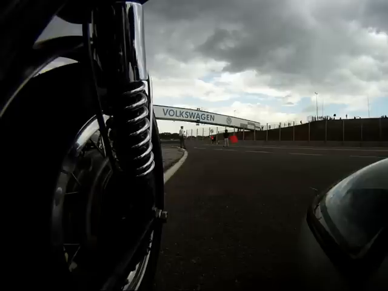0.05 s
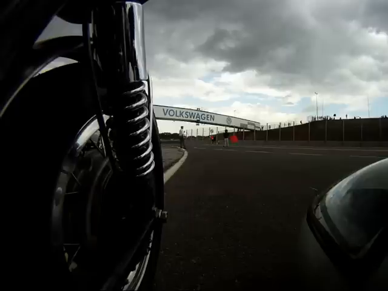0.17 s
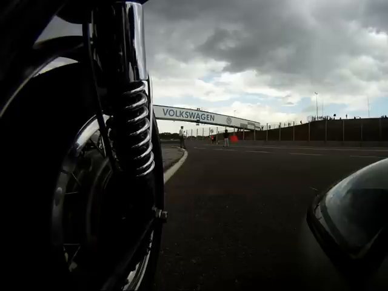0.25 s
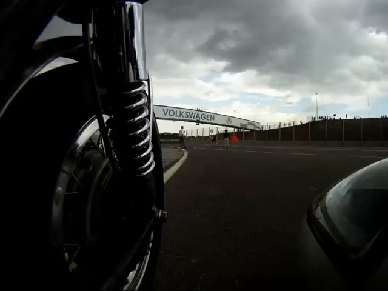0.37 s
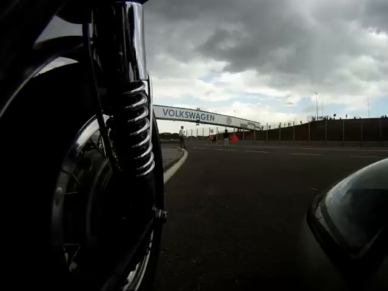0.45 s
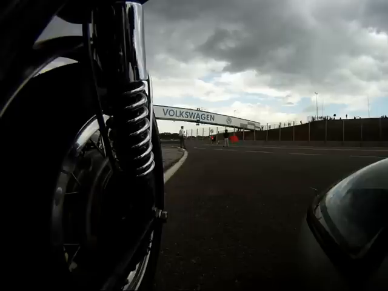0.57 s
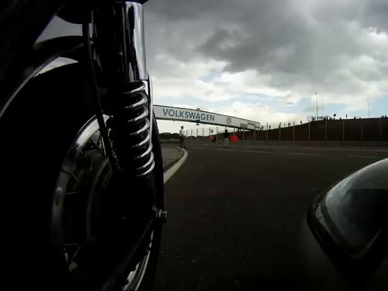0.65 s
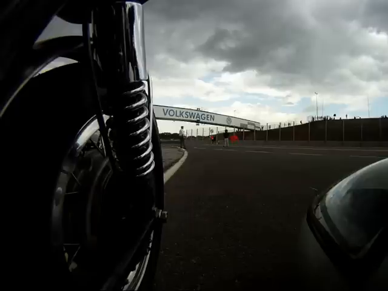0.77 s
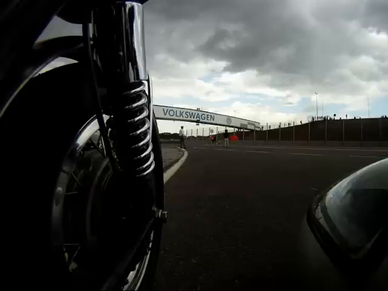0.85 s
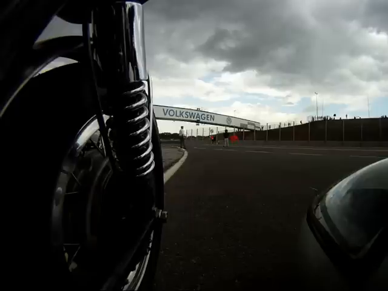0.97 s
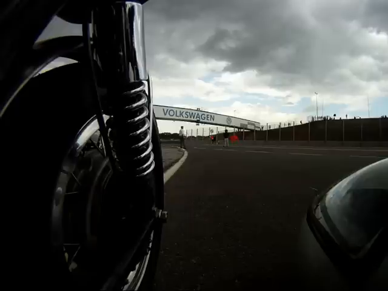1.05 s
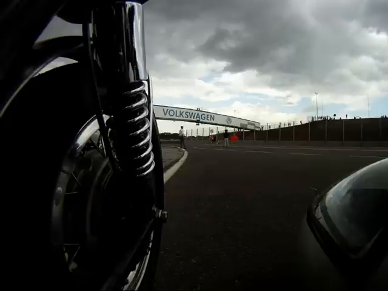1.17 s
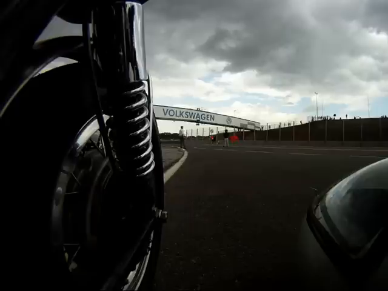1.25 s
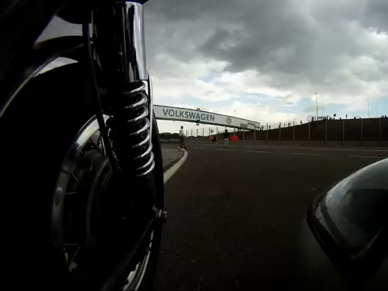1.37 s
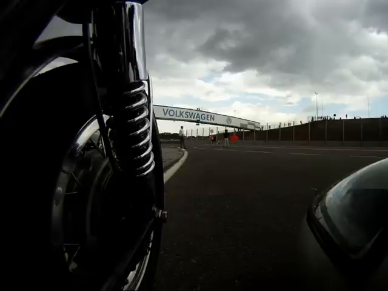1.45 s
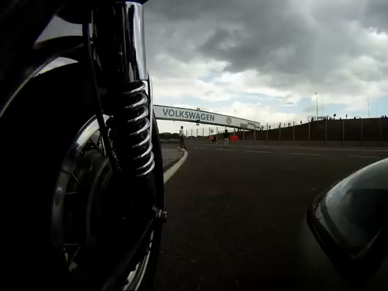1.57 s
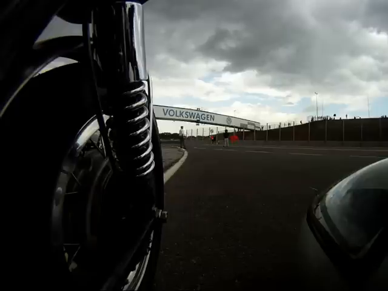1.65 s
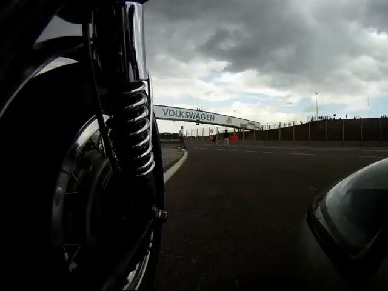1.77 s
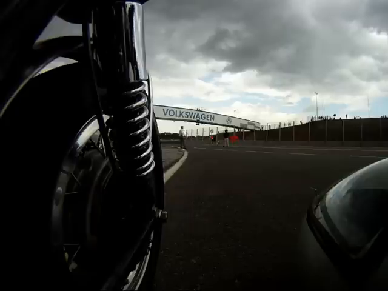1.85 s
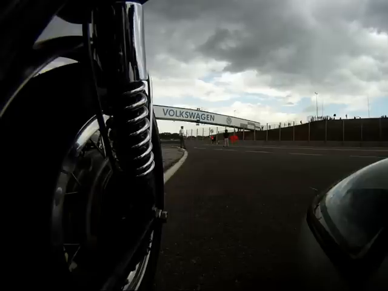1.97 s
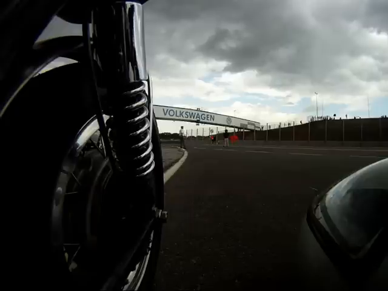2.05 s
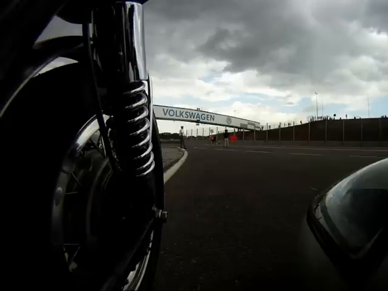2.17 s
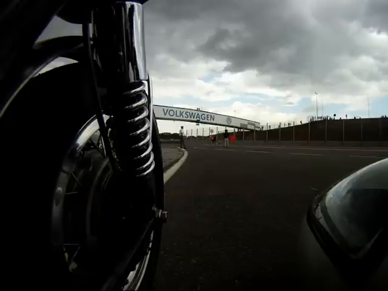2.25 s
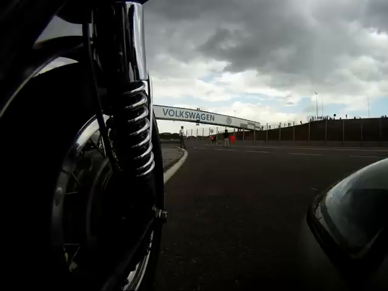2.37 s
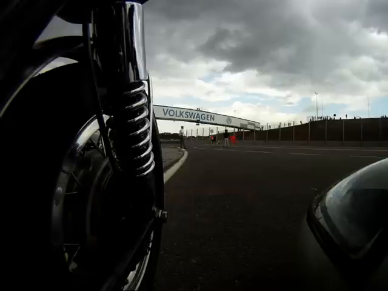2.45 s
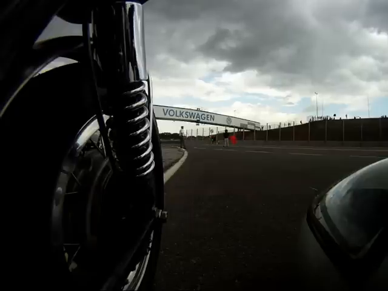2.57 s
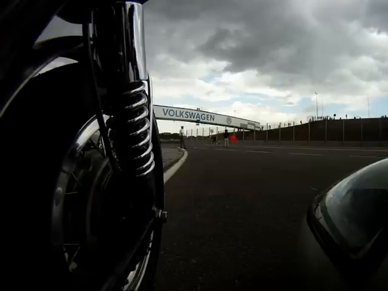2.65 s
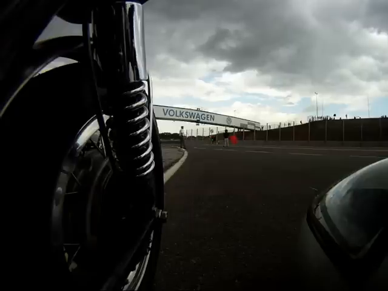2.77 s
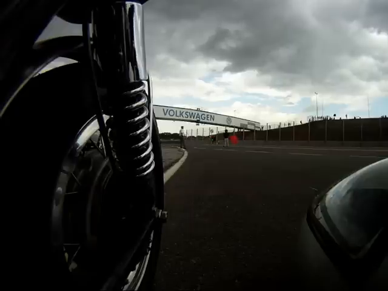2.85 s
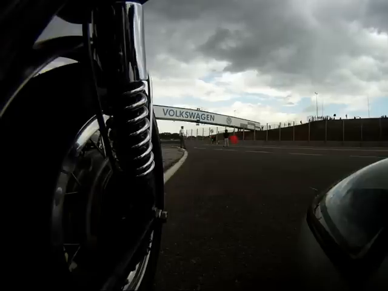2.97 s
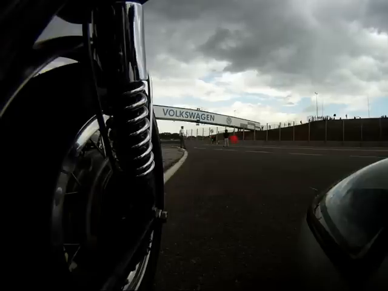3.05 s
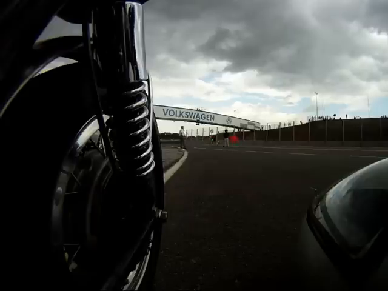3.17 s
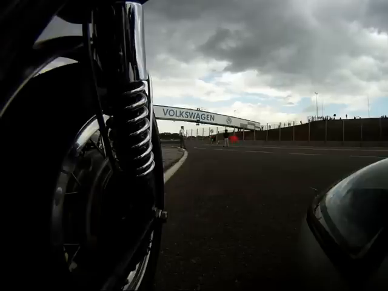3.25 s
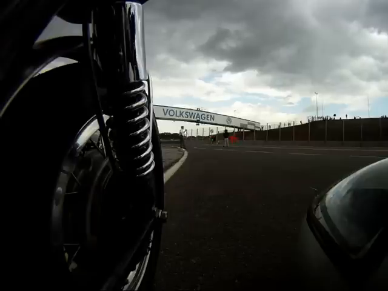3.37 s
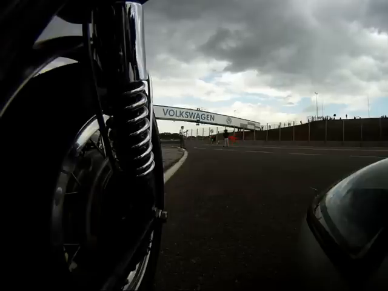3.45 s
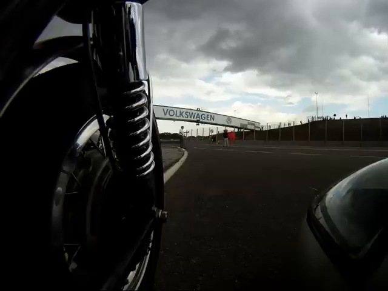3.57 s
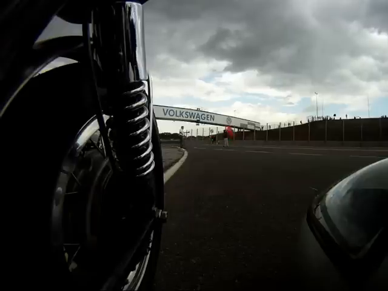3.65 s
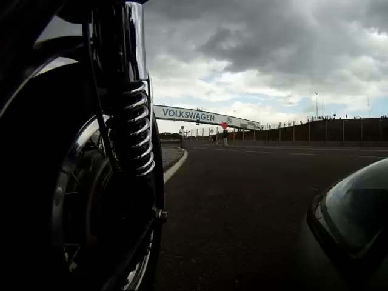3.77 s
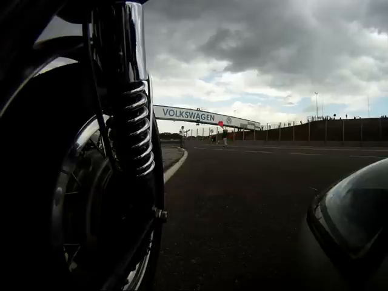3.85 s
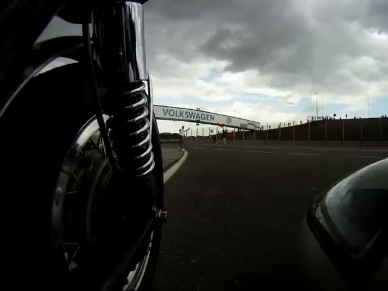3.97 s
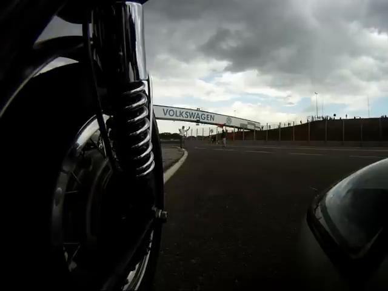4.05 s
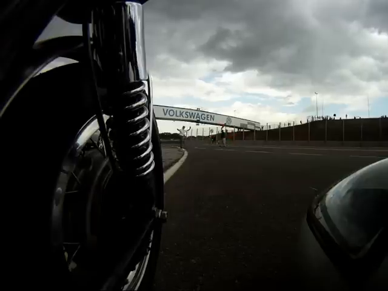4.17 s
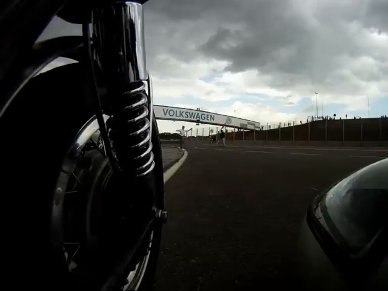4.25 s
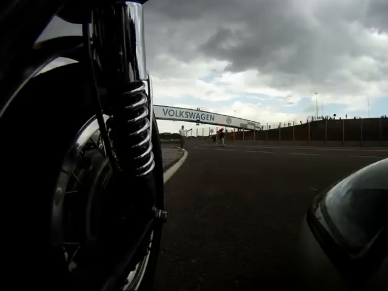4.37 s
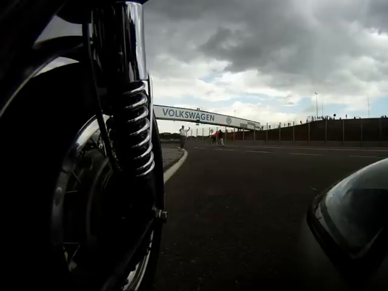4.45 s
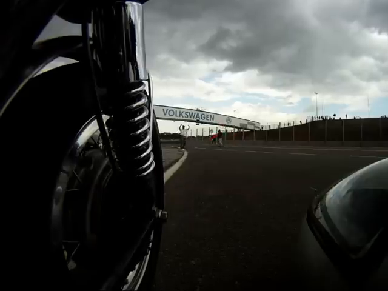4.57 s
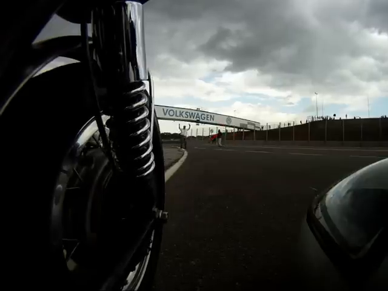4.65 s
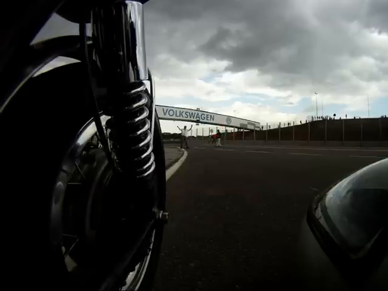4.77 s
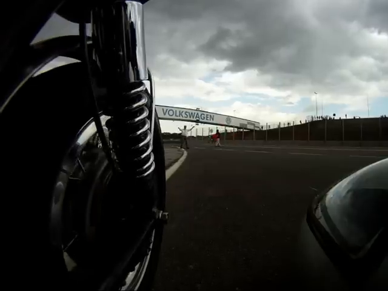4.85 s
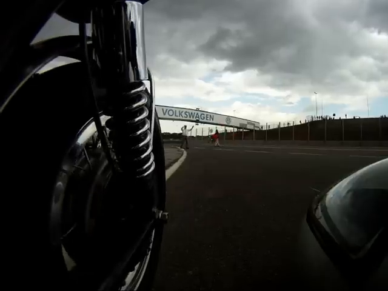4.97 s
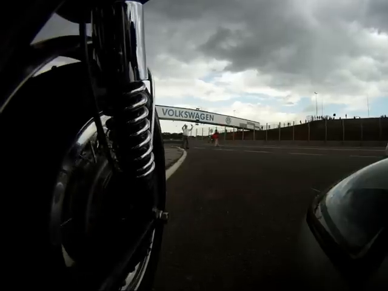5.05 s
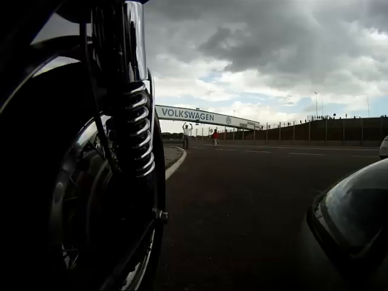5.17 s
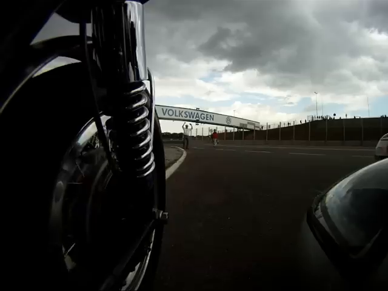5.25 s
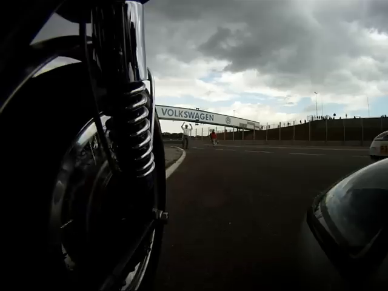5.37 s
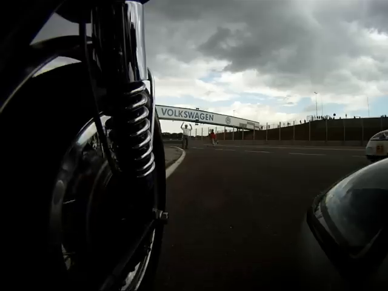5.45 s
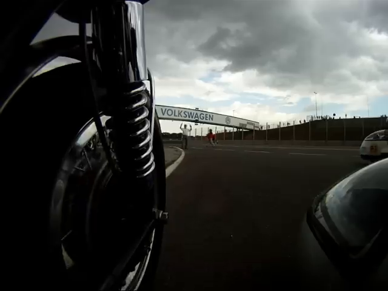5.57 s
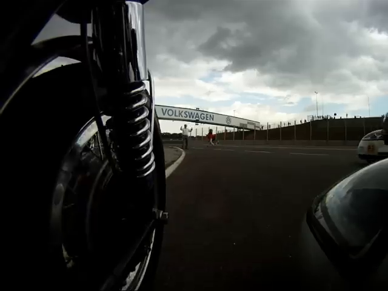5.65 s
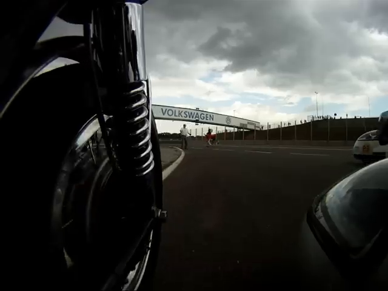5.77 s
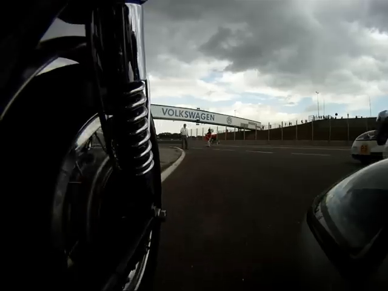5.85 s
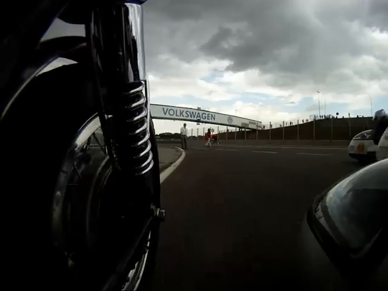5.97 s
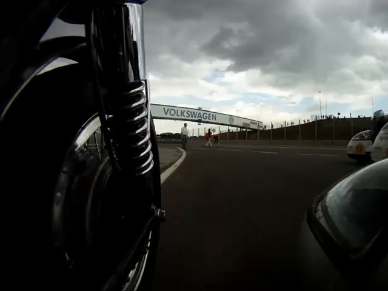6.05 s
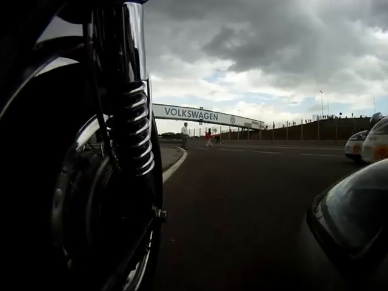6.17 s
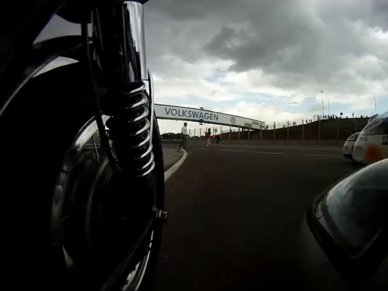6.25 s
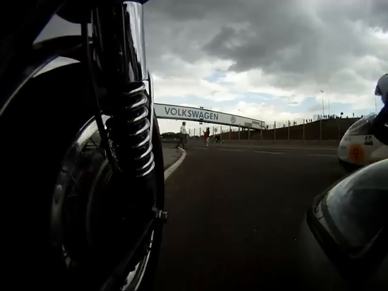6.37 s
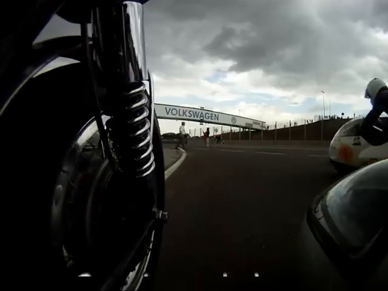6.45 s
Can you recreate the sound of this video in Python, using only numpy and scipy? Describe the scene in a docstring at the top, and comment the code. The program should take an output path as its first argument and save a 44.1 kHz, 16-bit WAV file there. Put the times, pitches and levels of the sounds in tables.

```python
"""Racing sidecar pulling away.

A four-stroke twin idles: low orders throb, noise clatters, uneven firings ring the pipe, the frame rumbles.
Ringing noise bursts tick beside it, likely the fuel pump. The throttle opens, firings strike the body modes,
gliding sines chirp as the clutch grabs, the drive train knocks, the pipe booms and low noise thumps and swells.
Revs stumble up, peak and sag under load while the firings merge into a drone of clean sine orders."""
import sys
import numpy as np
from scipy import signal
from scipy.fft import rfft, irfft, next_fast_len
from scipy.io import wavfile
from scipy.ndimage import uniform_filter1d, map_coordinates

SR = 44100
rng = np.random.default_rng(int(sys.argv[2]) if len(sys.argv) > 2 else 0)


def output_pcm(signal):
    """Save a mono or channel-first signal as 16-bit PCM at the path in sys.argv[1].

    Samples are clipped to [-1, 1] before scaling.
    """
    pcm = np.clip(np.atleast_2d(signal).T, -1, 1) * 32767
    wavfile.write(sys.argv[1], SR, np.round(pcm).astype(np.int16))


N = 286650


def amp(db):
    """Decibels to gain."""
    return 10 ** (np.asarray(db) / 20)


def unit(x):
    """Scale to rms 1."""
    return x / np.sqrt(np.mean(x ** 2) + 1e-20)


def steady(x, size=8800):
    """Hold the running rms near 1; size in samples."""
    power = uniform_filter1d(uniform_filter1d(x * x, size), size // 2)
    return x / np.sqrt(np.abs(power) + 1e-14)


def curves(rows):
    """One value per sample for each column after the time."""
    time_s, *columns = np.transpose(rows)
    return [np.interp(np.arange(N) / SR, time_s, column) for column in columns]


def wobble(rate_hz):
    """Smooth random curve, rate_hz knots a second."""
    knots = rng.standard_normal(int(N * rate_hz / SR) + 4)
    return map_coordinates(knots, [np.arange(N) * rate_hz / SR])


def ramp(start_s, rise_s):
    """0 to 1, starting at start_s."""
    return np.clip((np.arange(N) / SR - start_s) / rise_s, 0, 1)


def noise():
    """Fresh white noise."""
    return rng.standard_normal(N)


def filtered(x, response):
    """x times a complex response of frequency."""
    size = next_fast_len(N + SR // 2)
    spectrum = rfft(x, size) * response(np.fft.rfftfreq(size, 1 / SR))
    return irfft(spectrum, size)[:N]


def coloured(x, spectrum):
    """x through (Hz, dB) points with closed ends, at rms 1."""
    hz, db = np.transpose(spectrum)
    log_hz = np.log(np.r_[hz[0] / 2, hz, hz[-1] * 2])
    closed_db = np.r_[-120, db, -120]
    return unit(filtered(x, lambda f: amp(np.interp(np.log(f + 1), log_hz, closed_db))))


def ring(x, modes, low_hz, high_hz):
    """x through resonances of alternating sign, dark outside the band."""
    def response(f):
        body = 0
        for k, (centre_hz, width_hz, db) in enumerate(modes):
            damping = 1j * f * width_hz
            body = body + (-1) ** k * amp(db) * damping / (centre_hz ** 2 - f * f + damping)
        return body / (1 + (low_hz / (f + 1)) ** 6) / (1 + (f / high_hz) ** 6)
    return filtered(x, response)


def burst(start_s, t60_s):
    """Envelope that starts at start_s and dies away."""
    t = np.maximum(np.arange(N) / SR - start_s, 0)
    return (1 - np.exp(-t / 0.00024)) * amp(-60 * np.minimum(t / t60_s, 2))


def firings(cycle, scatter_db, jitter_cycles):
    """One pulse train per cylinder, firing alternately, two firings a cycle in all."""
    count = np.arange(1, int(2 * cycle[-1]))
    chance = rng.standard_normal((len(count), 2))
    at = np.interp(count / 2 + jitter_cycles * chance[:, 0], cycle, np.arange(N))
    # windowed sinc places each pulse between samples
    taps = at.astype(int)[:, None] + np.arange(-7, 9)
    off = taps - at[:, None]
    pulse = np.sinc(off) * np.cos(np.pi * off / 16) ** 2 * amp(scatter_db * chance[:, 1:])
    taps = np.clip(taps, 0, N - 1)
    return [np.bincount(taps[c::2].ravel(), pulse[c::2].ravel(), N) for c in (0, 1)]


def puffs(cycle, depth_db):
    """Noise reset at each firing interval, then falling by depth_db (rising if negative) until the next."""
    return noise() * amp(-depth_db * (2 * cycle % 1))


# hum of the idling engine: (order of the cycle, level [dB])
IDLE_HUM = [(6, -44.5), (7, -43), (10, -34), (11, -45.5), (12, -46.5), (14, -39.5), (15, -41.5),
            (16, -47.5), (20, -45.5), (22, -49), (24, -49.5), (26, -46.5), (30, -56), (35, -52.5)]
# valve gear spectrum: (frequency [Hz], density [dB per Hz])
CLATTER = [(200, 13.5), (400, 0.5), (600, -6.5), (850, -5.5), (1200, 0), (1650, -10.5), (2000, 2),
           (2450, -2.5), (3200, -7), (4200, -9), (5200, -10), (6200, -18)]
# engine covers rung by the valve gear: (frequency [Hz], width [Hz], level [dB])
COVER_MODES = [(1916, 37, 3.5), (2245, 92, 1.5), (2487, 49, 3), (2847, 23, 1.5), (3135, 75, -1),
               (3300, 87, -4.5), (3400, 63, -7)]


def idle(cycle, load):
    """Low orders throb while the valve gear clatters; both fade as load comes on."""
    hum = np.zeros(N)
    for order, db in IDLE_HUM:
        phase = 2 * np.pi * (order * cycle + rng.random()) + 0.21 * wobble(7.1)
        hum += amp(db + 1.48 * wobble(5.81)) * np.sin(phase)
    shake = amp(1.0 * wobble(30) + 1.6 * wobble(190))
    valves = amp(-45.5) * coloured(shake * puffs(cycle, depth_db=1.0), CLATTER)
    covers = amp(-48.5) * unit(ring(shake * noise(), COVER_MODES, low_hz=1700, high_hz=3700))
    return (1 - load ** 2) * (np.sqrt(2) * hum + valves + covers)


# pipe resonances: (frequency [Hz], width [Hz], level [dB])
PIPE = [(59.7, 42, -11.5), (90.4, 35, 3.5), (153.7, 20.7, 4.5), (225, 81, -7), (274, 33.5, -4.5),
        (407, 70, -34.5)]
THUD_IDLE_DB, THUD_LOADED_DB = -40, -25  # before the lumpy fade


def exhaust(cycle, load, lumpy):
    """Uneven firings and gas noise ring the pipe, harder under load."""
    first, second = firings(cycle, scatter_db=2, jitter_cycles=0.0079)
    gas = steady(first + .7 * second) + .9 * noise()
    thud_db = THUD_IDLE_DB + load * (THUD_LOADED_DB - THUD_IDLE_DB)
    return lumpy * amp(thud_db) * steady(ring(gas, PIPE, low_hz=46, high_hz=470))


# frame spectrum: (frequency [Hz], density [dB per Hz])
RUMBLE = [(25, -15), (45, -2.5), (90, 1), (250, -7), (450, -14), (600, -29)]
# drive train knocks: (time [s], level [dB], t60 [s])
KNOCKS = [(4.08, -37, .09), (4.119, -33, .04), (4.146, -31, .043), (4.28, -34, .14), (4.339, -33.5, .11),
          (4.755, -27, .064), (5.415, -21, .08), (5.432, -7.5, .034)]
# drive train resonances: (frequency [Hz], width [Hz], level [dB])
KNOCK_MODES = [(1110, 610, -10.5), (1640, 370, -6), (2010, 200, 1), (2265, 150, 3), (3120, 570, -12.5)]
# level at idle; change under load; change as the firings even out
RUMBLE_IDLE_DB, RUMBLE_LOAD_DB, RUMBLE_SMOOTH_DB = -43.5, 15, -4


def chassis(load, lumpy):
    """The frame shudders as the engine takes the load; the drive train knocks as it takes up slack."""
    rumble_db = RUMBLE_IDLE_DB + RUMBLE_LOAD_DB * load + RUMBLE_SMOOTH_DB * (1 - lumpy)
    rumble = amp(rumble_db) * coloured(noise(), RUMBLE)
    knocks = sum(amp(db) * burst(start_s, t60_s) for start_s, db, t60_s in KNOCKS)
    return rumble + knocks * unit(ring(noise(), KNOCK_MODES, low_hz=700, high_hz=5000))


# runs of pump strokes: (first stroke [s], interval [s], strokes [count], level before ringing [dB])
PUMP_RUNS = [(.1463, .08, 1, -40.5), (.371, .085, 2, -38), (.5985, .08, 1, -38.5), (.9043, .0787, 2, -38),
             (1.297, .0777, 8, -40), (1.982, .0664, 6, -38.5), (2.508, .0665, 6, -36.5),
             (2.976, .065, 3, -38), (3.241, .065, 1, -36), (3.3862, .064, 2, -39), (3.5845, .0698, 6, -39),
             (4.075, .069, 5, -38.5), (4.41, .05, 13, -40)]
# pump housing: (frequency [Hz], width [Hz], level [dB])
TICK_MODES = [(3230, 66, 6.5), (3940, 94, 1.5), (4420, 29, 2.5), (4640, 47, 4.5), (4777, 27, 6),
              (5440, 100, 1)]
PUMP_SCATTER_S, PUMP_SCATTER_DB = .001, 0.56  # from stroke to stroke


def pump():
    """Each stroke rattles a small metal housing; the strokes crowd together as the engine draws fuel."""
    ticks = []
    for first_s, interval_s, count, db in PUMP_RUNS:
        ticks += [(first_s + k * interval_s, db) for k in range(round(count))]
    ticks = np.array(ticks)
    ticks = ticks + rng.standard_normal(ticks.shape) * [PUMP_SCATTER_S, PUMP_SCATTER_DB]
    strokes = np.zeros(N)
    t = np.arange(SR // 20) / SR
    for start_s, db in ticks:
        # slow and fast decay
        rattle = amp(db + 9.5 - 60 * t / 0.12) + amp(db + 5.5 - 60 * t / 0.011)
        strokes[round(start_s * SR):][:len(t)] += rattle * rng.standard_normal(len(t))
    return ring(strokes, TICK_MODES, low_hz=2980, high_hz=7360)


# throttle: (time [s], opening [0-1])
THROTTLE = [(4.2, 0.17), (4.35, 0.56), (4.7, 0.7), (5.05, .35), (5.15, 0.72), (5.3, 0.4), (5.77, 0.89),
            (6, .45), (6.3, 0.32), (6.5, 0.25)]
# body modes driven by both cylinders alike: (frequency [Hz], width [Hz], level [dB])
EVEN_MODES = [(355, 14, 11), (487, 10, 1), (680, 17, -4), (962, 40, 8), (1078, 40, 11.5), (1252, 50, 13),
              (1596, 35, 7.5), (1932, 39, 8.5), (2456, 40, 5.5), (3350, 290, -18)]
# body modes driven by the cylinders' difference: (frequency [Hz], width [Hz], level [dB])
ODD_MODES = [(336, 17.6, 10), (458, 67, 12.5), (542, 290, 1), (671.4, 32, 8.5), (886, 120, 2.5),
             (1201, 23, 10.5), (1630, 140, -2), (2230, 73, -7), (3120, 110, -29)]
# casing spectrum: (frequency [Hz], density [dB per Hz])
RASP = [(200, 5), (450, -13), (750, -6.5), (1200, -1), (1450, -10.5), (1780, -3.5), (2100, 6.5), (2700, -9),
        (3200, -4.5), (4000, -17.5), (5200, -18.5), (6200, -19.5)]
TOP_SPEED_HZ = 53  # reference, four-stroke cycles a second
RASP_START_S, RASP_RISE_S = 3.84, 0.25  # bark and casing rasp fade in
# at reference speed, throttle open; growth with speed; drop with throttle shut
BARK_DB, BARK_DB_PER_OCTAVE, BARK_THROTTLE_DB = -20, 18, 1.5
RASP_DB, RASP_DB_PER_OCTAVE, RASP_THROTTLE_DB = -16, 9, 13.5


def rasp(cycle, speed_hz):
    """Each firing strikes the body modes and shakes the casing, harder with speed and throttle."""
    octaves = np.log2(speed_hz / TOP_SPEED_HZ)
    shut = 1 - curves(THROTTLE)[0]
    bark_db = BARK_DB + BARK_DB_PER_OCTAVE * octaves - BARK_THROTTLE_DB * shut
    rasp_db = RASP_DB + RASP_DB_PER_OCTAVE * octaves - RASP_THROTTLE_DB * shut
    first, second = firings(cycle, scatter_db=1.1, jitter_cycles=.0005)
    even = ring(first + second, EVEN_MODES, low_hz=350, high_hz=3800)
    odd = ring(first - second, ODD_MODES, low_hz=330, high_hz=3760)
    bark = steady(even + odd)
    # casing rattle repeats more closely from firing to firing at speed
    alike = np.clip(.58 * speed_hz / TOP_SPEED_HZ, 0, 1)
    t = np.arange(SR // 40) / SR
    rattle = np.zeros(N)
    for cylinder in (first, second):
        strike = rng.standard_normal(len(t)) * amp(-60 * t / 0.092)
        rattle += signal.fftconvolve(cylinder, strike)[:N]
    shake = amp(1.6 * wobble(45) + 0.2 * wobble(250))
    loose = unit(puffs(cycle, depth_db=-0.5))
    grit = shake * (np.sqrt(alike) * steady(rattle) + np.sqrt(1 - alike) * loose)
    casing = steady(coloured(grit, RASP))
    return ramp(RASP_START_S, RASP_RISE_S) * (amp(bark_db) * bark + amp(rasp_db) * casing)


# clutch chirps: (centre time [s], frequency [Hz], Gaussian half-width to e^-2 [s], level [dB])
CHIRPS = [(4.08, 850, .03, -50), (4.16, 830, .03, -47), (4.28, 970, .025, -39), (4.34, 1030, .025, -37),
          (4.36, 870, .025, -40), (4.52, 760, .02, -41), (4.61, 1480, .02, -38), (4.68, 880, .025, -36),
          (4.845, 860, .04, -32), (4.94, 840, .025, -27), (4.965, 850, .02, -34)]


def clutch():
    """The plates grab in short, rough, falling chirps."""
    out = np.zeros(N)
    t = np.arange(-SR // 10, SR // 10) / SR
    for centre_s, hz, length_s, db in CHIRPS:
        waver_rad = .5 * wobble(160)[:len(t)]
        tone = np.sin(2 * np.pi * hz * (t - 0.51 * t * t) + waver_rad)
        chirp = amp(db) * np.exp(-2 * (t / length_s) ** 2) * tone
        out[round(centre_s * SR) - SR // 10:][:len(t)] += chirp
    return out * amp(2 * wobble(150))


# pipe gain on the firing harmonics: (frequency [Hz], gain [dB])
BOOM_SHAPE = [(45, -34), (70, -11), (100, 0), (122, -5), (150, 6), (178, 0), (205, -30), (280, -8.5),
              (350, -24), (450, -15)]
# at reference speed; growth with speed; unsteadiness
BOOM_DB, BOOM_DB_PER_OCTAVE, BOOM_FLUTTER_DB = -18.5, 3, 3


def boom(cycle, speed_hz, load, lumpy):
    """One firing harmonic after another sweeps through the pipe's resonance and swells."""
    hz, db = np.transpose(BOOM_SHAPE)
    orders = np.arange(2, 16, 2)[:, None]
    gains = amp(np.interp(orders * speed_hz, hz, db))
    tone = np.sqrt(2) * np.sum(gains * np.sin(2 * np.pi * orders * cycle), axis=0)
    growth_db = BOOM_DB_PER_OCTAVE * np.log2(speed_hz / TOP_SPEED_HZ)
    level_db = BOOM_DB + growth_db + BOOM_FLUTTER_DB * wobble(35)
    return load * lumpy * amp(level_db) * tone


# low thumps and swells: (time [s], level [dB], t60 [s])
THUMPS = [(4.637, -17, 0.18), (4.942, -18.5, 0.24), (5.13, -21, 0.43), (5.216, -21.5, 0.21),
          (6.478, -18, 0.14)]
# thump spectrum: (frequency [Hz], density [dB per Hz])
THUMP_SPECTRUM = [(35, -14), (70, 1), (300, 8.5), (480, -5), (800, -30), (2000, -70)]


def thumps():
    """Low thumps and swells of decaying coloured noise."""
    envelope = sum(amp(db) * burst(start_s, t60_s) for start_s, db, t60_s in THUMPS)
    return coloured(noise(), THUMP_SPECTRUM) * envelope


# exhaust gain on even orders, cylinders alike: (frequency [Hz], gain [dB])
DRONE_EVEN = [(75, -4), (95, 0), (106, -1.5), (155, -1), (180, -7), (203, -14), (214, -7), (238, -15),
              (280, -9), (320, -11), (380, -17), (430, -30)]
# exhaust gain on odd orders, cylinders' difference: (frequency [Hz], gain [dB])
DRONE_ODD = [(150, -25), (220, -22), (262, -11), (300, -13), (370, -25)]
SMOOTH_S, SMOOTH_RISE_S = 5.25, 0.15  # lumpy firings even out
DRONE_DB, DRONE_FLUTTER_DB = -15.5, 1.3  # level; unsteadiness of each order
DRONE_THROTTLE_DB = 6.5  # growth of orders above 2, shut to open throttle


def drone(cycle, speed_hz):
    """At high revs the firings merge into clean orders, each swelling as it glides through a resonance."""
    push_db = DRONE_THROTTLE_DB * (curves(THROTTLE)[0] - .6)
    out = np.zeros(N)
    for order in range(2, 9):
        hz, db = np.transpose(DRONE_ODD if order % 2 else DRONE_EVEN)
        level_db = DRONE_DB + np.interp(order * speed_hz, hz, db) + DRONE_FLUTTER_DB * wobble(22)
        if order > 2:
            level_db = level_db + push_db
        out += amp(level_db) * np.sin(2 * np.pi * order * cycle)
    return np.sqrt(2 * ramp(SMOOTH_S, SMOOTH_RISE_S)) * out


# idle, stumbling pick-up, peak, sag under load: (time [s], speed [four-stroke cycles/s])
SPEED = [(0, 10.42), (1.5, 10.24), (2.6, 10.31), (3.3, 10.45), (4.32, 10.5), (4.47, 15), (4.54, 19),
         (4.75, 21.9), (4.891, 28), (4.96, 24.6), (5.03, 25), (5.159, 31), (5.2, 35.5), (5.394, 44.7),
         (5.506, 47.9), (5.622, 50.6), (5.8, 53.2), (5.89, 53.2), (6.1, 50.6), (6.31, 45.3), (6.5, 41.3)]
LOAD_S, LOAD_RISE_S = 4.305, 0.26  # engine takes the load


def scene():
    """One crankshaft drives all the engine's voices."""
    speed_hz, = curves(SPEED)
    cycle = np.cumsum(speed_hz + 0.033 * wobble(20)) / SR
    load = ramp(LOAD_S, LOAD_RISE_S)
    lumpy = np.sqrt(1 - ramp(SMOOTH_S, SMOOTH_RISE_S))
    engine = idle(cycle, load) + exhaust(cycle, load, lumpy) + rasp(cycle, speed_hz)
    engine += boom(cycle, speed_hz, load, lumpy) + drone(cycle, speed_hz)
    return (engine + chassis(load, lumpy) + pump() + clutch() + thumps())[None]


SAMPLER_HZ, TOP_HZ = 12000, 15400  # slow sampling rate; final cutoff


def record(dry):
    """Peaks round off; slow sample-and-hold mirrors the sound into a treble fizz."""
    rounded = dry[0] / (1 + np.abs(dry[0] / .8) ** 8) ** (1 / 8)
    narrow = filtered(rounded, lambda hz: np.clip((SAMPLER_HZ / 2 + 250 - hz) / 900, 0, 1))
    # images either side of the sampling rate, then the hold's sinc response
    mirrored = narrow * (1 + 2 * np.cos(2 * np.pi * SAMPLER_HZ * np.arange(N) / SR))
    return filtered(mirrored, lambda hz: np.sinc(hz / SAMPLER_HZ) * (hz < TOP_HZ))[None]


dry = scene()
out = record(dry)
output_pcm(out)
```